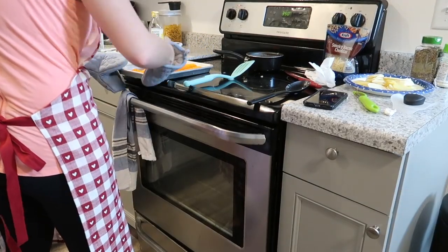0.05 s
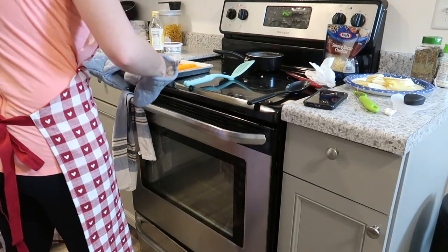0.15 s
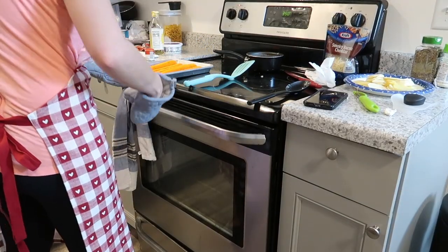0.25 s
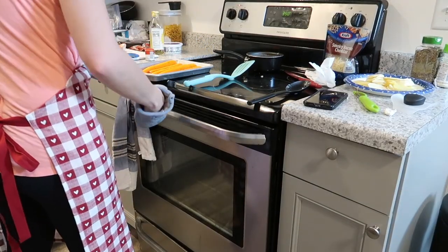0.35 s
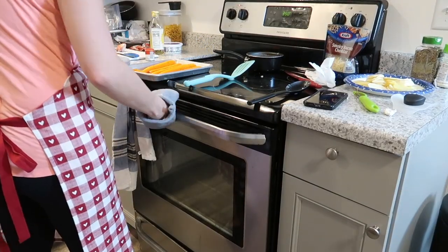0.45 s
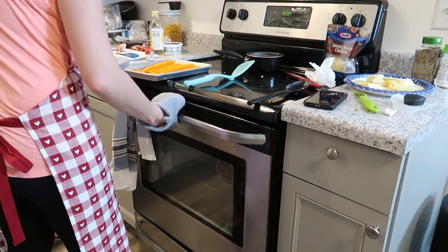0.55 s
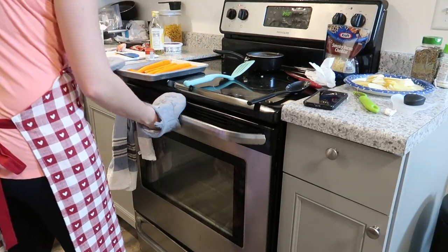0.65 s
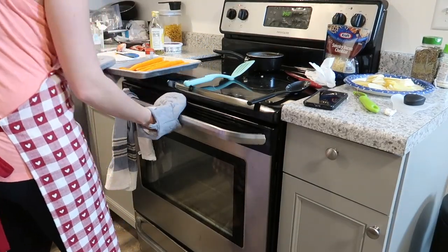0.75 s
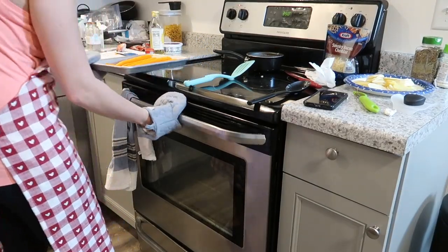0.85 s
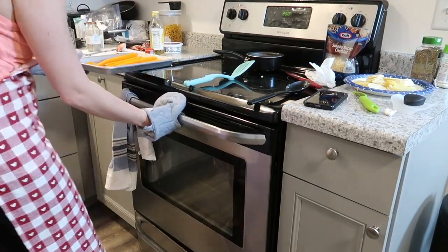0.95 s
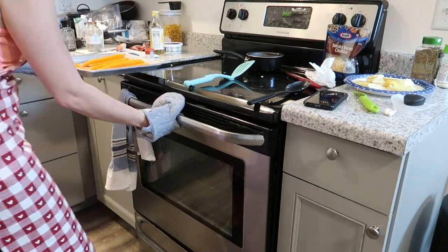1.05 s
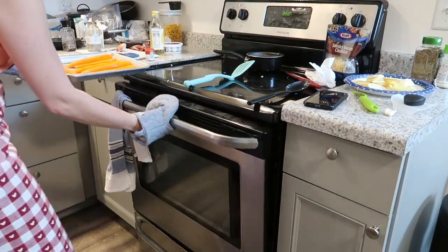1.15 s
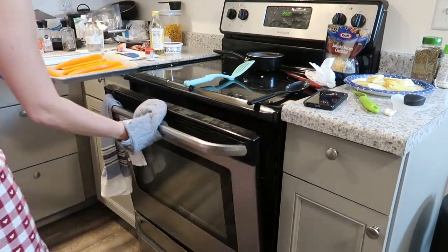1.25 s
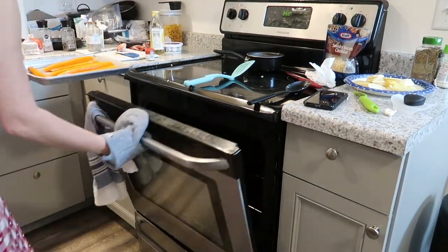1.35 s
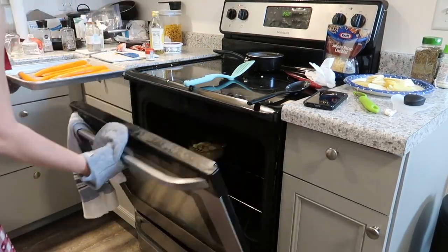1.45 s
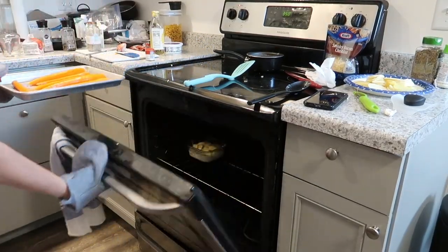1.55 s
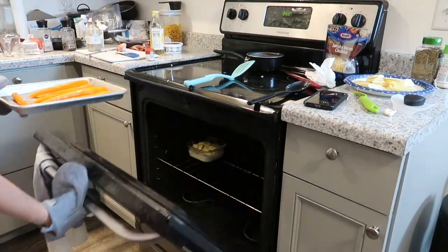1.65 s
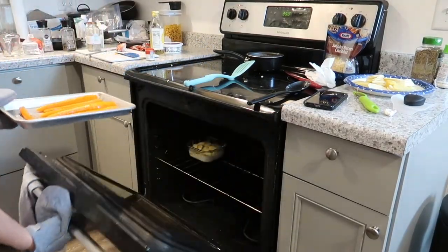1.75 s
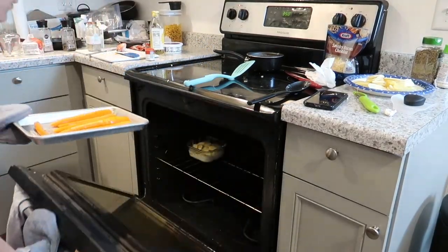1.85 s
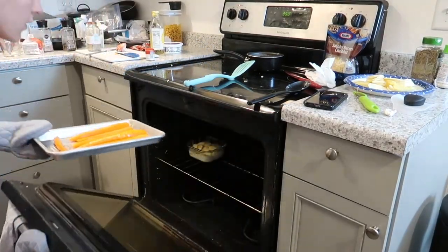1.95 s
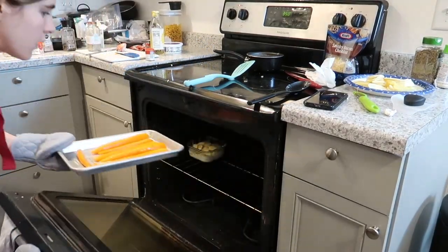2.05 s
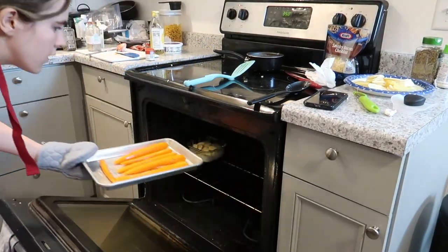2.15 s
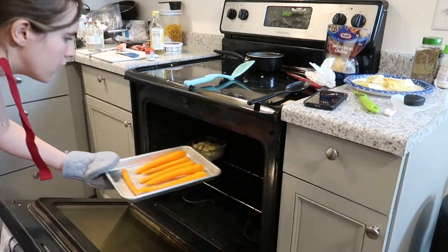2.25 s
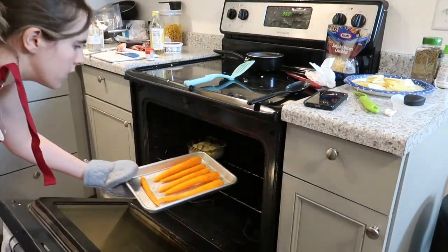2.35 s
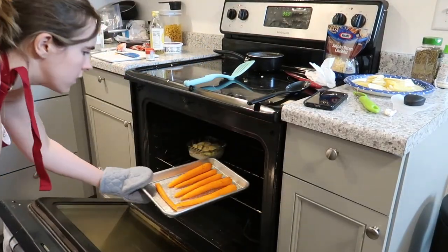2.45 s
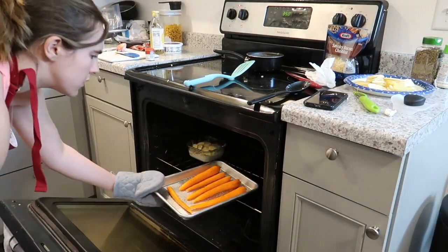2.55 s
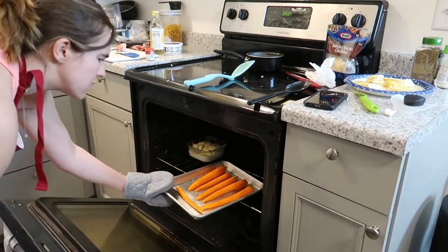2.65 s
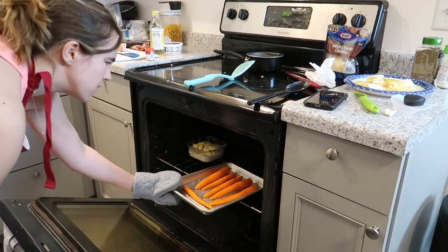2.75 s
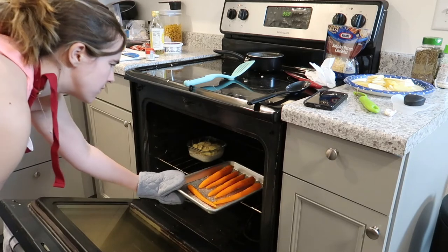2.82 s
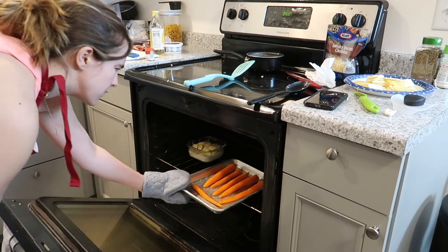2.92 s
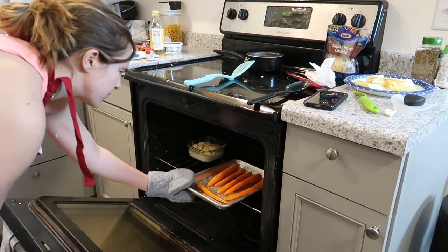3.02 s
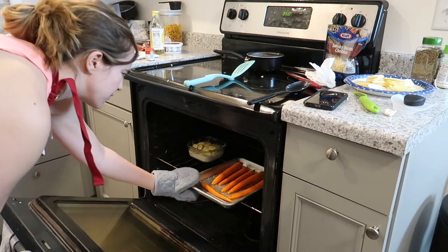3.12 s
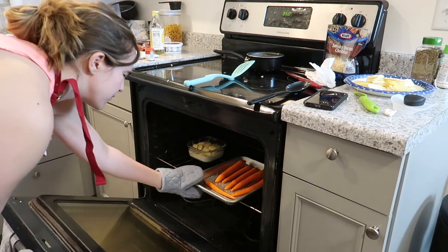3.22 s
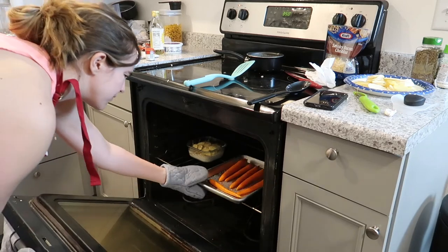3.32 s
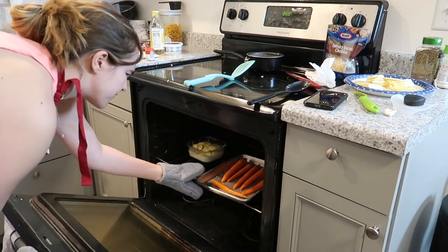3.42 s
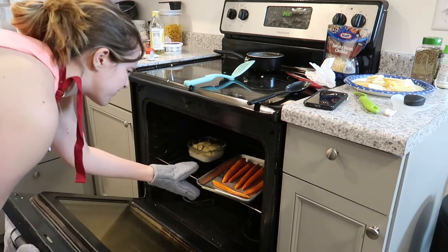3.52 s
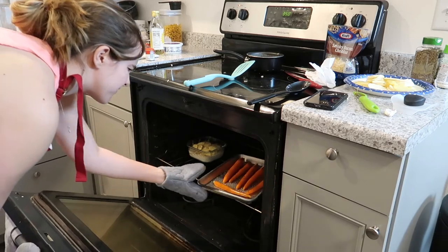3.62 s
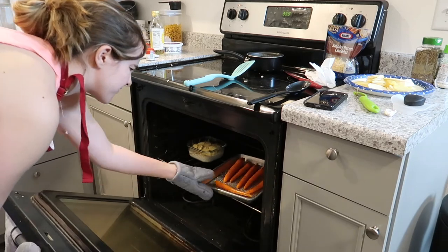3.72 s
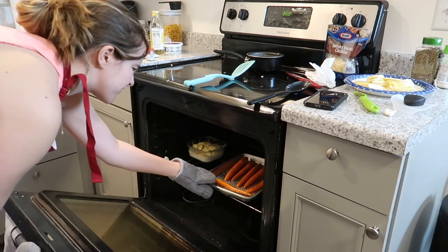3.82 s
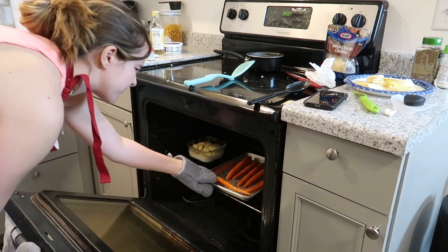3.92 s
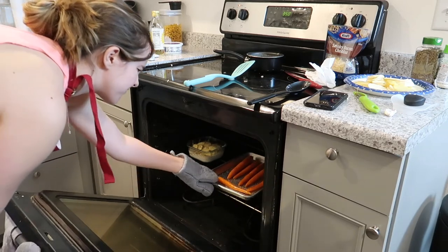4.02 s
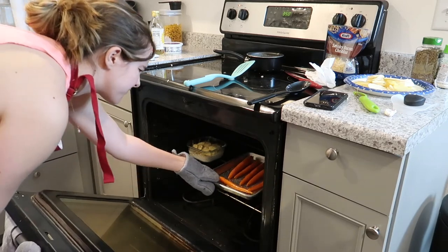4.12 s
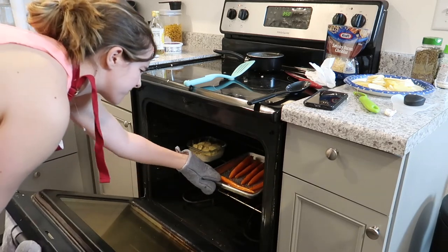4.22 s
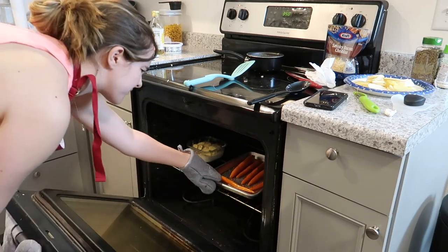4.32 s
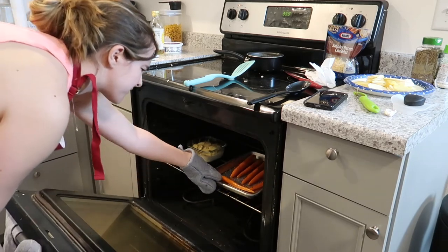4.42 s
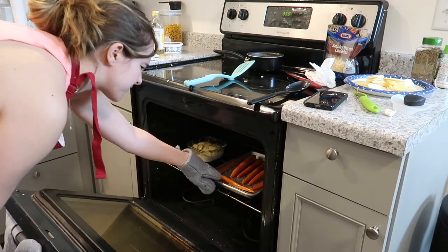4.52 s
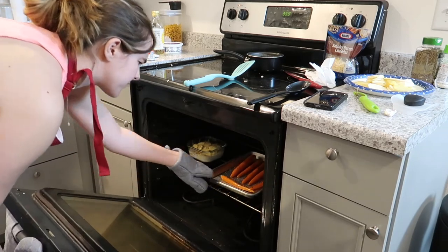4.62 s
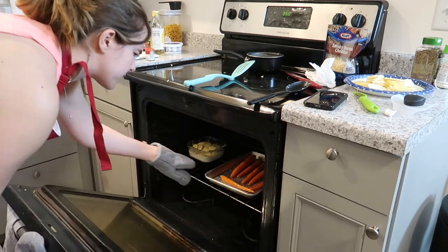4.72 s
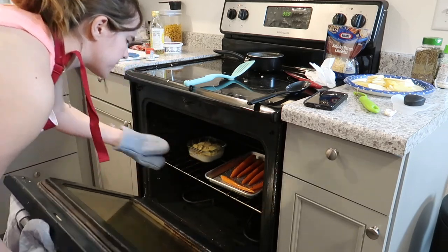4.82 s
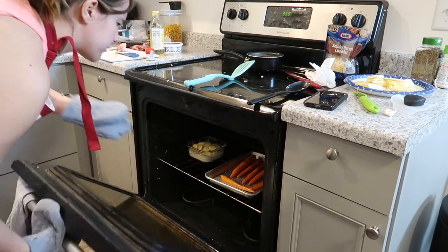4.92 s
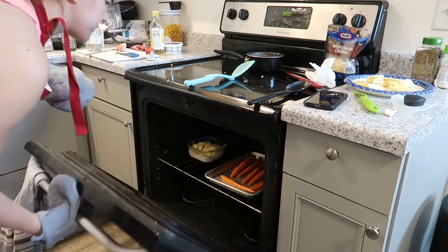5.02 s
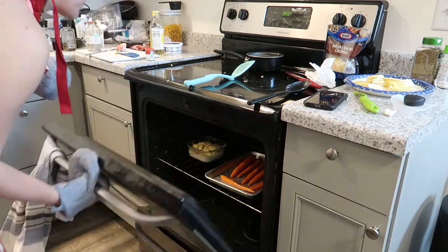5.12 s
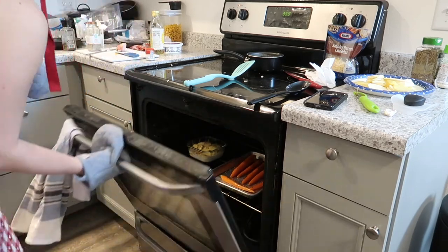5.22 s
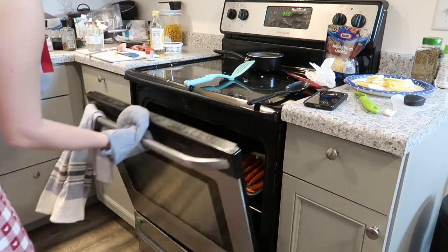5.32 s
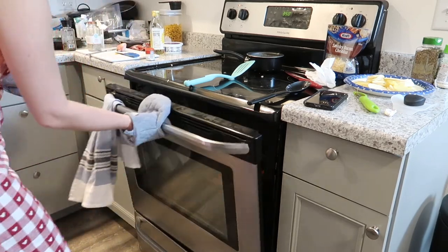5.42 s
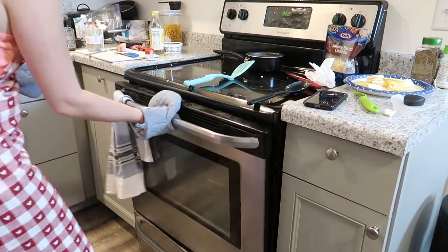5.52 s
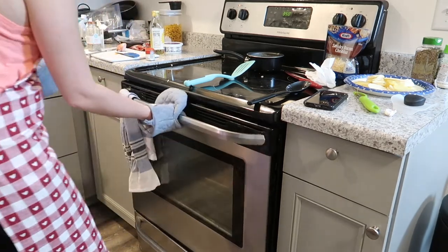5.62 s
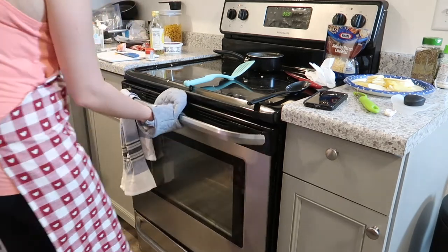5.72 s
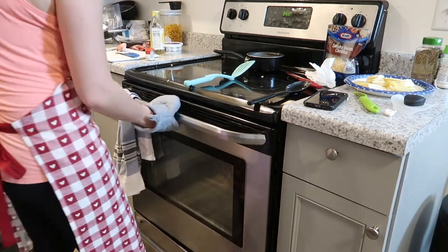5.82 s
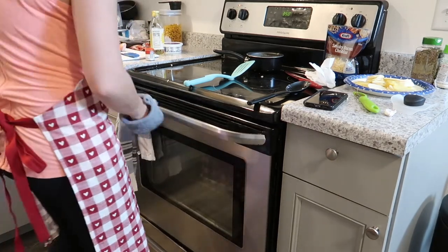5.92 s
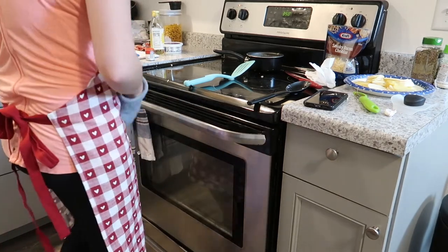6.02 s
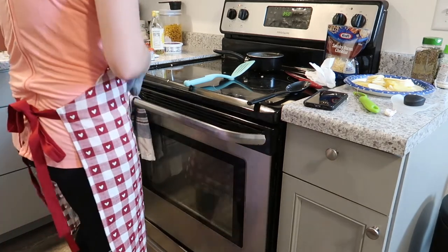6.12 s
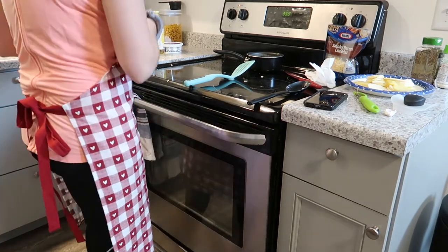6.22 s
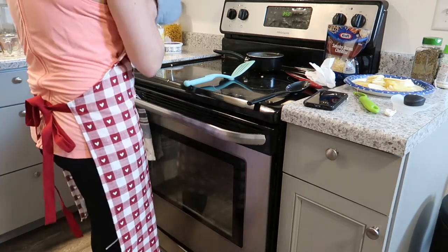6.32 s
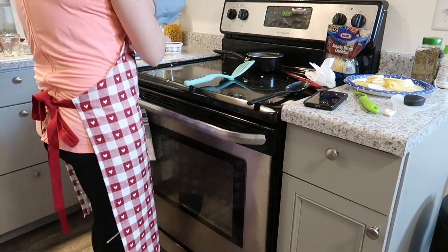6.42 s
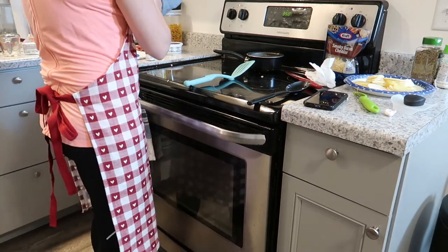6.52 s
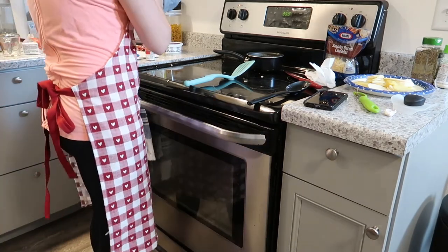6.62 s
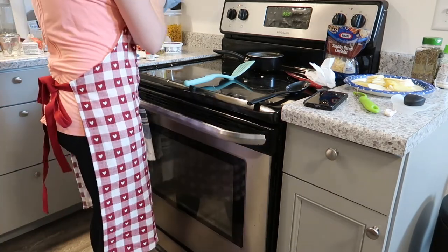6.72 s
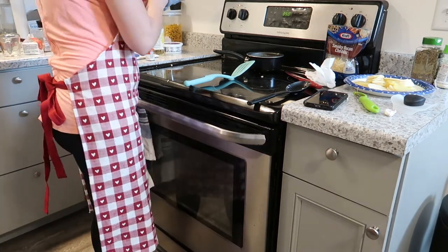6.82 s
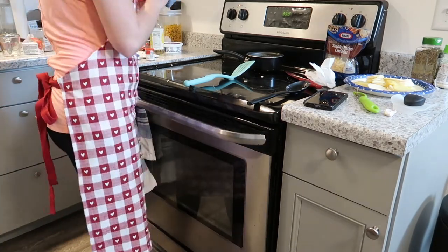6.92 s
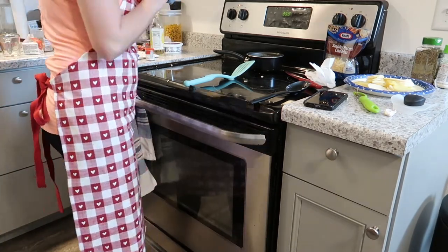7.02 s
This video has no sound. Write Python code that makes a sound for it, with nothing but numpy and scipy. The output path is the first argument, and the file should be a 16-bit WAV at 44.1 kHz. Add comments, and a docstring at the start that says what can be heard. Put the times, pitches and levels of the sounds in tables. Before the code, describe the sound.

In a small kitchen, a hinge pops, a baking tray grates over oven wires to one loud clank, and the door claps closed.

```python
"""A metal baking tray lands on an oven's wire rack, scrapes along it and clanks home: clicks excite decaying modes,
and friction noise, ticks and gliding tones make the slide. Before it the oven door opens with a snap of its hinge;
after it the door claps shut with a low thump. Apron and mitts rustle as shaped noise, feet thud as low decaying
sines, and a coloured-noise hum lies underneath. Blows and rubbing echo in a small kitchen."""
import sys
import numpy as np
from scipy import signal
from scipy.fft import rfft, irfft, next_fast_len
from scipy.io import wavfile

SR = 44100
rng = np.random.default_rng(int(sys.argv[2]) if len(sys.argv) > 2 else 0)


def output_pcm(signal):
    """Save a mono or channel-first signal as 16-bit PCM at the path in sys.argv[1].

    Samples are clipped to [-1, 1] before scaling.
    """
    pcm = np.clip(np.atleast_2d(signal).T, -1, 1) * 32767
    wavfile.write(sys.argv[1], SR, np.round(pcm).astype(np.int16))


N = 311346
T = np.arange(N) / SR

# tray hitting the end of the rack: (time [s], level [dB], chatter t60 [s], brightness [dB/octave])
END_CLANKS = [(3.8315, -18.5, 0.022, 1), (3.8327, -17.5, 0.023, 5.5), (3.835, -14.5, 0.023, 2),
              (3.858, -28, 0.11, -4)]
# ringing of the tray: (frequency [Hz], level [dB], t60 [s])
TRAY_RING = [(515, 11, 0.41), (692, 2.5, 0.7), (740, 8, 0.5), (757, -2, 0.26), (940, 6.5, 0.25),
             (1310, 2, 0.15), (1280, 4, .2), (1400, 4, 0.19), (1570, 4, 0.16), (1850, -13, .2),
             (2110, 1, 0.3), (3100, -9, .25), (3600, -11, .25)]
# spectrum of the tray's contact: (frequency [Hz], level [dB/Hz])
TRAY_SPECTRUM = [(60, -3.5), (150, -6), (330, -1), (520, -2), (720, 2), (1050, -2.5), (1300, -1),
                 (2100, -1), (2900, -6.5), (3800, -9), (5200, -17), (8000, -24.5), (13000, -42),
                 (15000, -42)]
# short pushes of the tray along the rack: (start [s], length [s], friction [dB], treble gain [dB])
TRAY_SHOVES = [(2.841, 0.088, -36, -1), (3.134, 0.023, -37, 12.5), (3.228, 0.13, -33.5, 4),
               (3.549, 0.019, -42, -12), (3.81, 0.025, -43, 13.5)]
SHOVE_ATTACK_S, SHOVE_T60_S = 0.019, 0.65
# door jolting the oven's casing: (time [s], level [dB], brightness [dB/octave])
CASING_JOLTS = [(1.419, -36, 3.5), (1.756, -42, 10), (5.331, -49, 7.5), (5.458, -28, -6),
                (5.741, -25.5, -16)]


def from_db(db):
    """Decibels to gain."""
    return 10 ** (np.asarray(db) / 20)


def unit_energy(x):
    """Scale so that the squares of a channel sum to one, averaged over channels."""
    return x / np.sqrt(np.mean(np.sum(x ** 2, axis=-1)) + 1e-20)


def at_hz(points, hz):
    """Read a table on a log-frequency axis."""
    known_hz, values = np.transpose(points)
    return np.interp(np.log(np.maximum(hz, 1)), np.log(known_hz), values)


def add(out, s, sound):
    """Mix a sound in from time s."""
    start = max(round(s * SR), 0)
    out[..., start:start + sound.shape[-1]] += sound[..., :N - start]


def through(x, response):
    """Pass a sound through a response, keeping its length."""
    return signal.fftconvolve(np.atleast_2d(x), np.atleast_2d(response), axes=-1)[:, :x.shape[-1]]


def pulse(colour, tilt_db=0, size=8192):
    """Minimum-phase click with a given spectrum, tilted in dB per octave."""
    hz = np.fft.rfftfreq(size, 1 / SR)
    level_db = at_hz(colour, hz) + tilt_db * np.log2(np.clip(hz, 250, 5000))
    bass_cut = 1 + (.7 * colour[0][0] / np.maximum(hz, 1)) ** 4
    cepstrum = irfft(np.log(from_db(level_db) / np.sqrt(bass_cut)))
    # fold the cepstrum onto positive time: minimum phase
    cepstrum[1:size // 2] *= 2
    cepstrum[size // 2 + 1:] = 0
    return unit_energy(irfft(np.exp(rfft(cepstrum)))[:size // 2])


def air_noise(size):
    """White noise at two close microphones: alike in the bass, apart in the treble."""
    # stereo difference: (frequency [Hz], side minus mid [dB])
    side_minus_mid = [(60, -52), (170, -45), (350, -40), (700, -26.5), (1400, -22), (2800, -18.5),
                      (4800, -4), (7300, 6), (11000, 6)]
    padded = next_fast_len(size)
    apart = from_db(at_hz(side_minus_mid, np.fft.rfftfreq(padded, 1 / SR)))
    mid, side = rfft(rng.standard_normal((2, padded)))
    spectra = (mid + apart * side * [[1], [-1]]) / np.sqrt(1 + apart ** 2)
    return irfft(spectra, padded)[:, :size]


def flutter(per_s, depth_db):
    """A random gain of mean power one, with bounded peaks."""
    chance = np.clip(rng.standard_normal(N // 20), -3, 1.5)
    gain = from_db(depth_db * np.interp(T * per_s, np.arange(N // 20), chance))
    return gain / np.sqrt(np.mean(gain ** 2))


def dying(t60):
    """One second of exponential decay."""
    return from_db(-60 * T[:SR] / max(t60, .002))


def stroke(s, length, attack_s, t60, t=T):
    """The envelope of one motion: it swells, holds to the end of its length and dies away."""
    return np.clip((t - s) / attack_s, 0, 1) * from_db(-60 * np.clip((t - s - length) / t60, 0, 2))


def strokes(rows, attack_s, t60):
    """Motions of one kind; the strongest at each instant counts."""
    return np.max([from_db(db) * stroke(s, length, attack_s, t60) for s, length, db in rows], axis=0)


def ringing(modes, s=0, tilt_db=0, scatter_db=0.0):
    """A body's modes; brightness favours the high ones, and close blows reinforce the ring."""
    t = T[:SR]
    ring = 0
    for hz, db, t60 in modes:
        mode_db = db + tilt_db * np.log2(hz / modes[0][0]) + scatter_db * rng.standard_normal()
        # phase follows scene time, so successive blows add in step
        ring = ring + from_db(mode_db) * dying(t60) * np.sin(2 * np.pi * hz * (s + t))
    onset = 1 - np.exp(-t / .0005)
    return unit_energy(onset * ring)


def with_chatter(rows, chatter_t60):
    """Blows that all chatter for the same time."""
    return [(s, db, chatter_t60, tilt_db) for s, db, tilt_db in rows]


def blows(rows, colour, modes, click_db, ring_db, room_db):
    """Each blow is a click and a brief chatter that echo round the kitchen, while the body rings on."""
    ring_tilt_share = 0.58  # share of a blow's brightness that reaches the modes
    cracks, rings = np.zeros((2, 2, N))
    for s, level_db, chatter_t60, tilt_db in rows:
        strength = from_db(level_db) * np.sqrt(SR / 100)  # levels count over ten milliseconds
        contact = unit_energy(air_noise(SR // 4) * dying(chatter_t60)[:SR // 4])
        contact[:, 0] += from_db(click_db)
        add(cracks, s, strength * unit_energy(through(contact, pulse(colour, tilt_db))))
        add(rings, s, strength * ringing(modes, s, ring_tilt_share * tilt_db))
    return cracks + from_db(ring_db) * rings + from_db(room_db) * kitchen(cracks)


def rub_tones(rows, attack_s, t60):
    """Friction catches, sings on a gliding pitch and fades; jitter widens the tone towards a rub."""
    out, t = np.zeros(N), T[:SR]
    for s, level_db, hz, glide_hz_per_s, width_hz, length in rows:
        jitter_hz = np.sqrt(width_hz * SR / (2 * np.pi)) * rng.standard_normal(SR)
        glide_hz = glide_hz_per_s * np.minimum(t, length + t60 / 4)
        phase = 2 * np.pi * np.cumsum(hz + glide_hz + jitter_hz) / SR
        tone = np.sqrt(2) * np.sin(phase)
        add(out, s, from_db(level_db) * tone * stroke(0, length, attack_s, t60, t))
    return out


def hum():
    """The room's steady hum: noise coloured towards the bass."""
    # (frequency [Hz], level [dB/Hz])
    hum_spectrum = [(20, -13.5), (45, -4.5), (72, -0.5), (103, -7.5), (160, -11.5), (250, -12.5),
                    (400, -24), (800, -21.5), (2000, -43), (5000, -42.5), (15000, -48)]
    hum_db = -51
    return from_db(hum_db) * through(air_noise(N), pulse(hum_spectrum))


def kitchen(x, buildup_s=0.0026):
    """Dense reflections build up after the direct sound and die soonest in the top treble."""
    # reverberation: (frequency [Hz], t60 [s])
    room_decay = [(100, 0.75), (400, 0.52), (1500, 0.4), (4000, 0.43), (8000, 0.34), (14000, 0.14)]
    noise, tail = rfft(air_noise(SR)), 0
    hz = np.fft.rfftfreq(SR, 1 / SR)
    for centre_hz, t60 in room_decay:
        share = at_hz([(f, float(f == centre_hz)) for f, _ in room_decay], hz)
        tail = tail + irfft(noise * share) * dying(t60)
    buildup = 1 - np.exp(-(T[:SR] / buildup_s) ** 2)
    return through(x, unit_energy(tail * buildup))


def cloth():
    """With each move, fabric sways and rubs in small uneven strokes; long moves gather speed slowly."""
    # cook reaches, pulls, bends, lets go, rises, turns: (start [s], length [s], rustle [dB])
    cook_moves = [(.53, 0.25, -50.5), (.72, 0.58, -53), (1.372, 0.075, -50.5), (1.477, 0.22, -53),
                  (1.72, 0.07, -47.5), (2.05, 0.66, -57.5), (4.331, 0.042, -50), (4.615, 0.81, -53),
                  (5.008, 0.24, -49), (5.38, 0.39, -55), (5.722, 0.28, -45), (5.93, 0.49, -49),
                  (6.616, 0.34, -50.5)]
    # (frequency [Hz], level [dB/Hz])
    cloth_spectrum = [(100, 4), (400, 1.5), (800, -2), (2000, -0.5), (3600, -5), (5000, -10), (8000, -16),
                      (12000, -23.5), (15000, -37)]
    attack_share, t60_s = 0.38, 1.0  # share of a move spent gathering speed; its fade
    motion = np.max([from_db(db) * stroke(s, length, attack_share * length, t60_s)
                     for s, length, db in cook_moves], axis=0)
    folds = flutter(per_s=150, depth_db=2.5)
    sways = flutter(per_s=24, depth_db=3.5)
    return through(air_noise(N) * folds * sways * motion, pulse(cloth_spectrum))


def scuffs():
    """Mitts and towel scuff handle, door and tray; each rub excites one broad surface resonance."""
    # (time [s], level [dB], centre [Hz], width [octaves], length [s])
    scuff_rows = [(0.615, -57, 2530, 0.25, 0.073), (0.695, -47, 1950, 0.13, 0.032),
                  (0.69, -47.5, 4400, 0.47, .02), (0.79, -46.5, 1910, 0.39, 0.025),
                  (0.945, -64, 3100, 0.24, 0.0091), (1.023, -51, 2200, 0.3, 0.026),
                  (1.112, -56, 2150, 0.36, .035), (1.434, -52.5, 2800, 1, 0.035),
                  (1.789, -53.5, 2580, 0.85, 0.17), (4.148, -41, 2920, .3, 0.007),
                  (4.286, -55.5, 1730, 1, 0.035), (5.862, -54, 2700, 0.56, .02),
                  (5.877, -48, 1130, 0.96, 0.021), (5.922, -49, 1900, .6, 0.026),
                  (5.999, -57, 3490, 0.22, 0.31), (5.421, -53, 2590, 0.63, 0.017),
                  (5.49, -53, 2000, .3, 0.018), (5.672, -49, 1870, 0.77, .015),
                  (6.559, -49.5, 2700, 1, 0.017)]
    attack_s, t60_s = 0.003, 0.079
    out = np.zeros((2, N))
    for s, level_db, hz, octaves, length in scuff_rows:
        edges_hz = hz * 2 ** (np.array([-.5, .5]) * np.clip(octaves, .02, 2))
        band = signal.butter(2, edges_hz, "band", fs=SR, output="sos")
        rub = signal.sosfilt(band, air_noise(SR))
        add(out, s, from_db(level_db) * rub / rub.std() * stroke(0, length, attack_s, t60_s, T[:SR]))
    return out


def squeaks_and_swish():
    """Squeaks, rubs and a faint high swish of cloth: friction tones of jittering pitch."""
    # (time [s], level [dB], pitch [Hz], glide [Hz/s], width [Hz], length [s])
    tone_rows = [(0.797, -47.5, 1107, 0, 90, 0.026), (1.133, -48, 1627, 0, 250, 0.027),
                 (2.23, -53, 3600, 0, 350, 0.0088), (2.281, -48.5, 1834, 3800, 55.3, 0.035),
                 (5.998, -60, 5450, 200, 200, 0.28), (6.055, -58, 5420, -2, 220, 0.05),
                 (6.955, -48, 1512, -1000, 50.6, 0.0064)]
    return rub_tones(tone_rows, attack_s=0.004, t60=0.15)


def thuds():
    """Soft, heavy contacts swell within a cycle and ring low; a jolt sounds all the casing's modes."""
    # dull blows of door panel, tray, air and foot: (time [s], level [dB], pitch [Hz], t60 [s])
    single_thuds = [(1.185, -36, 355.5, 0.24), (3.8317, 6, 500, 0.02), (5.555, -37, 496, 0.092),
                    (5.702, -36, 352, 0.59), (5.745, -27, 25.8, 0.39), (6.015, -34.5, 198, 0.23)]
    # low ringing of the casing: (frequency [Hz], level [dB], t60 [s])
    casing_ring = [(73, -6, 0.49), (120.7, -9, 0.52), (198, -9, 0.062), (292, -15.5, 0.22)]
    rise_cycles = 0.62
    out, t = np.zeros(N), T[:SR]
    casing = [(s, db + mode_db + tilt_db * np.log2(hz / casing_ring[0][0]), hz, t60)
              for s, db, tilt_db in CASING_JOLTS for hz, mode_db, t60 in casing_ring]
    for s, level_db, hz, t60 in list(single_thuds) + casing:
        swell = 1 - np.exp(-t * hz / rise_cycles)
        add(out, s, from_db(level_db) * swell * dying(t60) * np.sin(2 * np.pi * hz * t))
    return out


def swing():
    """The moving door shakes the oven's casing into a low rumble, and more so after each jolt."""
    # door travels down, later up: (start [s], length [s], rumble [dB])
    door_swings = [(1.24, 1, -51.5), (4.85, 0.89, -52.5)]
    # (frequency [Hz], level [dB/Hz])
    swing_spectrum = [(30, -4.5), (70, 4.5), (130, -3.5), (250, -10), (480, -14), (800, -17.5), (2000, -34),
                      (8000, -95)]
    jolt_rumble_db, jolt_attack_s, jolt_t60_s = -9.5, 0.011, 0.64
    travel = strokes(door_swings, attack_s=0.028, t60=0.98)
    jolt_rows = [(s, jolt_attack_s, db + jolt_rumble_db) for s, db, _ in CASING_JOLTS]
    shudder = strokes(jolt_rows, jolt_attack_s, jolt_t60_s)
    return through(air_noise(N) * np.hypot(travel, shudder), pulse(swing_spectrum))


def stove_knocks():
    """Light knocks of hand and mitt on the stove, mostly chatter with a trace of the tray's ring."""
    # (time [s], level [dB], brightness [dB/octave])
    knock_rows = [(.89, -47, -0.5), (.951, -43.5, 1.5), (1.03, -46, -0.5), (1.11, -41.5, 1.5),
                  (4.152, -35.5, 0), (5.101, -45.5, -1.5), (5.452, -47.5, 6), (5.56, -51, 0),
                  (5.631, -49, -5), (6.4705, -39, 3.5), (6.497, -43, 0), (6.6325, -40.5, -0.5),
                  (6.7617, -49.5, 8)]
    # (frequency [Hz], level [dB/Hz])
    knock_spectrum = [(150, -11.5), (500, 2.5), (1100, 1.5), (1850, 2.5), (2400, 2.5), (3050, -4.5),
                      (3600, -7.5), (5000, -17.5), (8000, -50), (15000, -65)]
    rows = with_chatter(knock_rows, chatter_t60=0.072)
    return blows(rows, knock_spectrum, TRAY_RING, click_db=-23, ring_db=-33, room_db=-2.5)


def worktop_knocks():
    """The tray knocks on the worktop: long chatter, little ring."""
    # (time [s], level [dB], chatter t60 [s], brightness [dB/octave])
    worktop_rows = [(0.0, -23, 0.21, -2.5), (0.018, -29, 0.31, -3.5)]
    # (frequency [Hz], level [dB/Hz])
    worktop_spectrum = [(60, -21), (180, -14), (430, -4.5), (700, -1.5), (1100, -8.5), (1600, -3),
                        (2500, -5.5), (4000, -9.5), (6000, -15), (9000, -26.5), (14000, -56)]
    return blows(worktop_rows, worktop_spectrum, TRAY_RING, click_db=-23, ring_db=-27, room_db=-7.0)


def hinge_snaps():
    """The hinge spring lets go: chattering snaps ring the hinge."""
    # (time [s], level [dB], chatter t60 [s], brightness [dB/octave])
    snap_rows = [(1.138, -43, 0.12, 1.5), (1.1772, -29.5, 0.044, 6), (1.186, -27, 0.075, 3),
                 (1.197, -34.5, 0.078, -1)]
    # (frequency [Hz], level [dB/Hz])
    hinge_spectrum = [(150, -20), (350, 7), (700, -2), (1200, 0), (1600, -7), (2300, -0.5), (3100, -5.5),
                      (3450, -4), (3850, -3), (4300, -12), (5000, -14.5), (7000, -22), (9500, -28),
                      (11000, -20), (15000, -31)]
    # (frequency [Hz], level [dB], t60 [s])
    hinge_ring = [(955, -13, .5), (1195, -2, 0.2), (1185, 0, 0.57), (1400, -5, 0.47), (1720, -18, 0.58),
                  (2020, -4, 0.31), (2190, 3, 0.23), (2330, -2, 0.23), (2503, -4, 0.21), (2579, -4, 0.24),
                  (2885, 2, 0.14), (3090, 5, 0.09), (3550, -7, .15), (3870, 3, 0.08)]
    return blows(snap_rows, hinge_spectrum, hinge_ring, click_db=-30, ring_db=-9.5, room_db=-5.5)


def door_contacts():
    """The mitt grabs the door's handle; later the door strikes its frame and rattles, ringing the same modes."""
    # (time [s], level [dB], chatter t60 [s], brightness [dB/octave])
    contact_rows = [(0.703, -40.5, 0.074, 0.5), (0.724, -42.5, 0.036, -7.5), (5.7017, -23.5, 0.026, 2),
                    (5.7075, -22, 0.02, 9.5), (5.713, -35, 0.03, -0.5), (5.727, -48, 0.025, 11),
                    (5.742, -36, 0.04, 14), (5.865, -45, 0.08, -7.5), (5.893, -42, 0.081, -6),
                    (5.94, -44.5, 0.077, -7)]
    # (frequency [Hz], level [dB/Hz])
    door_spectrum = [(150, -16), (400, 1), (900, 0), (1250, -1.5), (1650, 5.5), (2300, 4.5), (2750, -4.5),
                     (3300, -9.5), (3850, -2), (4350, -9), (5100, -18.5), (6200, -19.5), (7700, -29.5),
                     (11000, -30), (15000, -30)]
    # (frequency [Hz], level [dB], t60 [s])
    door_ring = [(942, -15, 1), (1160, -8, 0.47), (1480, 13, 0.068), (1660, 12, 0.095), (1830, 0, 0.065),
                 (2000, -3, 0.086), (2180, 16, 0.053), (2510, -17, 0.18), (3020, 5, 0.083),
                 (3200, -16, .35), (3500, -21, 0.34), (4150, 11, 0.043), (3840, 13, 0.05), (4570, -10, 0.2),
                 (5040, -8, 0.12), (5170, -10, .15)]
    return blows(contact_rows, door_spectrum, door_ring, click_db=-16.0, ring_db=-4.5, room_db=-4)


def grates():
    """The tray's base grates on the wires, each time at another pitch."""
    # (time [s], level [dB], pitch [Hz], glide [Hz/s], width [Hz], length [s])
    grate_rows = [(2.9, -62, 2245, 0, 300, 0.021), (2.96, -52, 3840, 0, 160, .022),
                  (3.145, -33.5, 1246, 397, 40.5, 0.031), (3.163, -29, 2022, 2, 120, 0.011),
                  (3.168, -48, 3550, 2, 200, 0.014), (3.25, -41.5, 1300, -300, 70, 0.041),
                  (3.262, -38, 2150, 0, 150, 0.02), (3.315, -33, 1572, 298, 50, 0.015),
                  (3.325, -37.5, 965, -2400, 70, 0.062), (3.42, -44.5, 1310, 2, 150, 0.037),
                  (3.485, -43, 2350, 2, 120, 0.012), (3.565, -52, 1750, -2500, 90, 0.033)]
    return rub_tones(grate_rows, attack_s=0.0052, t60=0.175)


def wire_ticks(per_s, spread_db, ring_db, scatter_db, chatter_t60):
    """The tray's edge skips over the wires: uneven ticks, cycling through six variants of the tray's ring."""
    out = np.zeros((2, N))
    friction = strokes([row[:3] for row in TRAY_SHOVES], SHOVE_ATTACK_S, SHOVE_T60_S)
    click = pulse(TRAY_SPECTRUM)
    chance = rng.random((80, 3))
    times = TRAY_SHOVES[0][0] + np.cumsum(.2 + 1.6 * chance[:, 0]) / per_s
    ticks = []
    for _ in range(6):
        chatter = air_noise(SR // 2) * dying(chatter_t60)[:SR // 2]
        ring = ringing(TRAY_RING, scatter_db=scatter_db)[:SR // 2]
        ticks.append(unit_energy(through(chatter, click)) + from_db(ring_db) * ring)
    for k, (s, (_, size, sign)) in enumerate(zip(times, chance)):
        if s < END_CLANKS[0][0]:  # ticks stop at the clank
            strength = friction[round(s * SR)] * from_db(-spread_db * size) * np.sqrt(SR / per_s)
            add(out, s, np.sign(sign - .5) * strength * ticks[k % len(ticks)])
    return out


def scrape(slips_per_s, rough_db, ring_db):
    """The tray sticks and slips on the wires; the grains of friction keep its modes ringing."""
    shoves = np.array([from_db(db) * stroke(s, length, SHOVE_ATTACK_S, SHOVE_T60_S)
                       for s, length, db, _ in TRAY_SHOVES])
    friction = shoves.max(axis=0)
    # treble gain is the power-weighted mean over the shoves
    treble_db = np.array(TRAY_SHOVES)[:, 3] @ shoves ** 2 / (np.sum(shoves ** 2, axis=0) + 1e-20)
    slips = flutter(slips_per_s, rough_db)
    judder = flutter(per_s=49, depth_db=1.5)  # from wire to wire
    grains = air_noise(N) * slips * judder * friction
    sound = through(grains, pulse(TRAY_SPECTRUM)) + from_db(ring_db) * through(grains, ringing(TRAY_RING))
    treble = signal.sosfilt(signal.butter(1, 1500, "high", fs=SR, output="sos"), sound)
    return sound + (from_db(treble_db) - 1) * treble


def rim_hits():
    """The tray's rim strikes a wire of the rack and rings its own modes."""
    # (time [s], level [dB], chatter t60 [s], brightness [dB/octave])
    rim_rows = [(2.8435, -30.5, 0.027, 1.5), (2.965, -42.5, 0.06, 5), (3.7855, -41.5, 0.02, 5),
                (3.791, -39, 0.025, -3.5)]
    # (frequency [Hz], level [dB/Hz])
    rim_spectrum = [(150, -9), (500, -6), (1100, -5), (1750, 3), (2400, -2.5), (3000, -10.5), (3750, -2.5),
                    (4150, -5), (4550, -11), (5300, -10.5), (7000, -18), (10000, -27), (15000, -42)]
    # (frequency [Hz], level [dB], t60 [s])
    rim_ring = [(1380, 3.5, 0.15), (1610, -5, 0.2), (1830, -2, .05), (2150, 0, .06), (2340, -2, .18),
                (3280, -1, 0.16), (3607, -6, 0.13), (3670, 2, .08), (3730, 12, 0.035), (3960, 7, 0.07),
                (4080, -4, .1), (4791, -14, 0.34)]
    return blows(rim_rows, rim_spectrum, rim_ring, click_db=-21, ring_db=1.5, room_db=4.0)


def tray_rattle():
    """The tray rattles on the rack: chattering taps ring its modes."""
    # (time [s], level [dB], brightness [dB/octave])
    tap_rows = [(2.875, -37, 1.5), (2.925, -38, -1), (3.139, -26.5, -0.5), (3.158, -27.5, 4),
                (3.171, -27.5, 0.5), (3.256, -29.5, 0.5), (3.269, -42, 1), (3.309, -31.5, 1),
                (3.332, -29.5, -0.5), (3.349, -39, -1), (3.371, -40, -1), (3.429, -34.5, 2),
                (3.5655, -45, 0), (3.655, -46.5, 7), (3.711, -34.5, 0.5), (3.808, -33, 0), (3.822, -31, 1)]
    rows = with_chatter(tap_rows, chatter_t60=0.12)
    return blows(rows, TRAY_SPECTRUM, TRAY_RING, click_db=-13.5, ring_db=-9, room_db=-4.5)


def clank():
    """The tray hits the end of the rack and sets the rack's wires ringing."""
    # (frequency [Hz], level [dB/Hz])
    rack_spectrum = [(60, -36), (120, -11), (220, -13), (290, -2), (420, -6.5), (620, -4.5), (860, -9.5),
                     (1250, -11), (1450, -10), (2000, -14), (2500, -19.5), (3050, -14.5), (3600, -25),
                     (4250, -19.5), (5500, -29), (8600, -35.5), (15000, -44)]
    # (frequency [Hz], level [dB], t60 [s])
    rack_ring = [(279.3, -5, 0.25), (293, -7, 1), (326, -3, 0.17), (412.4, -2, 0.28), (472, 9, 0.088),
                 (507, 7.5, 0.23), (542, 4.5, 0.2), (636, 4, 0.35), (652, 0, 0.3), (672, 6.5, 0.22),
                 (732, -15, 0.22), (860, -9, 0.38), (1103, -16, 0.79), (1125, -8, 0.25), (1415, 14, 0.06),
                 (1424, -6, 0.26), (1743, -13, 0.17), (2090, -3.5, 0.16), (2450, -19, .18),
                 (2800, -20, 0.23), (3075, -2, 0.17), (3350, 2, 0.084), (4400, -5, 0.1)]
    return blows(END_CLANKS, rack_spectrum, rack_ring, click_db=-13.5, ring_db=-7.0, room_db=-6.0)


def scene():
    """Tray, door and cook, close to the microphones in the humming room."""
    low = thuds() + from_db(2.0) * swing()
    slide = from_db(-2.5) * scrape(slips_per_s=600, rough_db=4.0, ring_db=-10.5)
    ticks = wire_ticks(per_s=55, spread_db=13, ring_db=-5, scatter_db=8, chatter_t60=0.024)
    slide = slide + from_db(-3.0) * ticks + grates()
    rubbing = slide + from_db(-1.0) * cloth() + scuffs() + squeaks_and_swish()
    rubbing = rubbing + from_db(-6.0) * kitchen(rubbing)
    cook_and_door = stove_knocks() + worktop_knocks() + hinge_snaps() + door_contacts()
    tray = rim_hits() + tray_rattle() + clank()
    return hum() + low + rubbing + cook_and_door + tray


def record(dry):
    """Each microphone adds its own hiss; peaks clip at full scale; the top is cut."""
    # (frequency [Hz], level [dB/Hz])
    hiss_spectrum = [(35, -46), (60, -30), (151, -1.5), (186, -6), (372, 1.5), (633, -7.5), (1670, -10.5),
                     (2420, -12), (3050, -13.5), (8040, -26.5), (10400, -32), (15000, -46)]
    hiss_db, cutoff_hz = -54.5, 15000
    hiss = from_db(hiss_db) * through(rng.standard_normal((2, N)), pulse(hiss_spectrum))
    lowpass = signal.ellip(10, .1, 80, cutoff_hz, fs=SR, output="sos")
    return signal.sosfilt(lowpass, np.clip(dry + hiss, -1, 1))


dry = scene()
out = record(dry)
output_pcm(out)
```